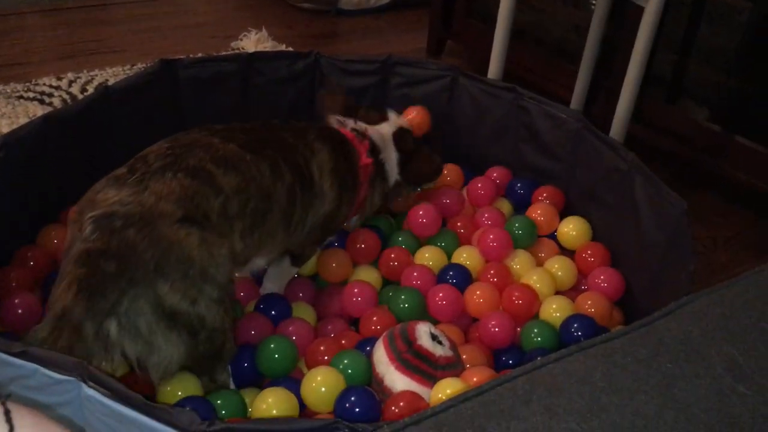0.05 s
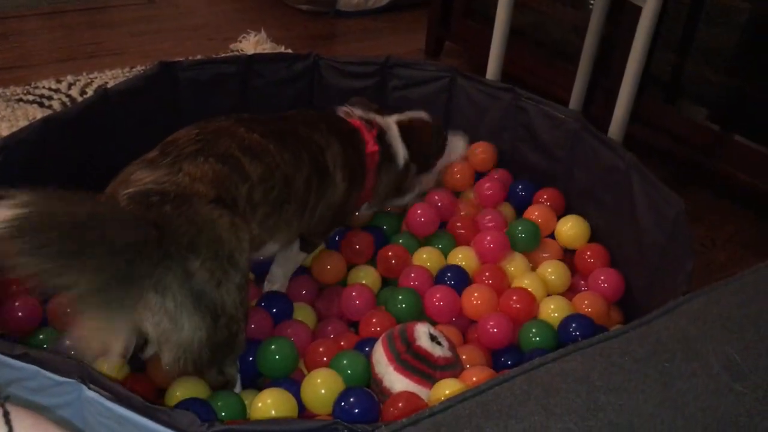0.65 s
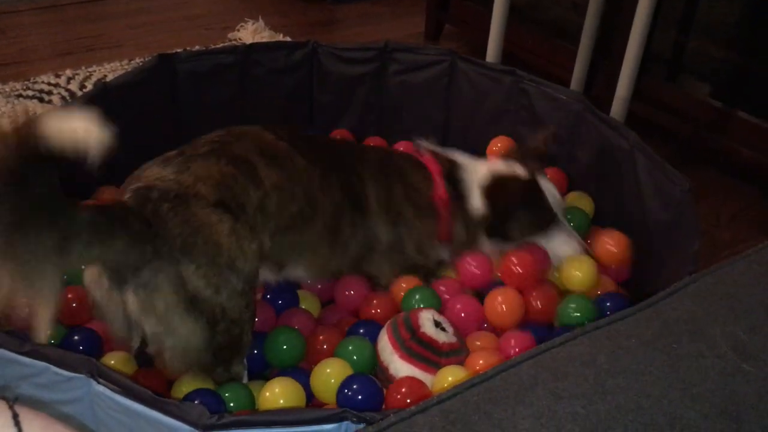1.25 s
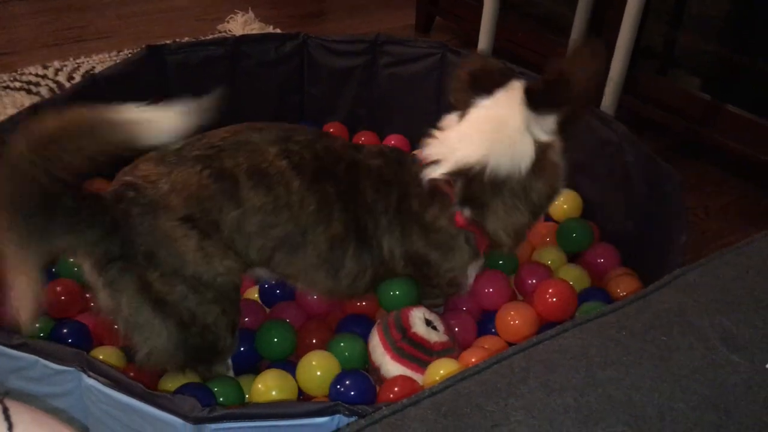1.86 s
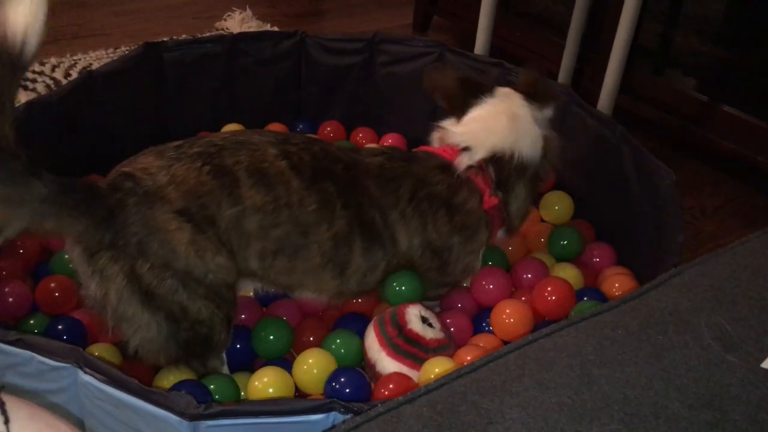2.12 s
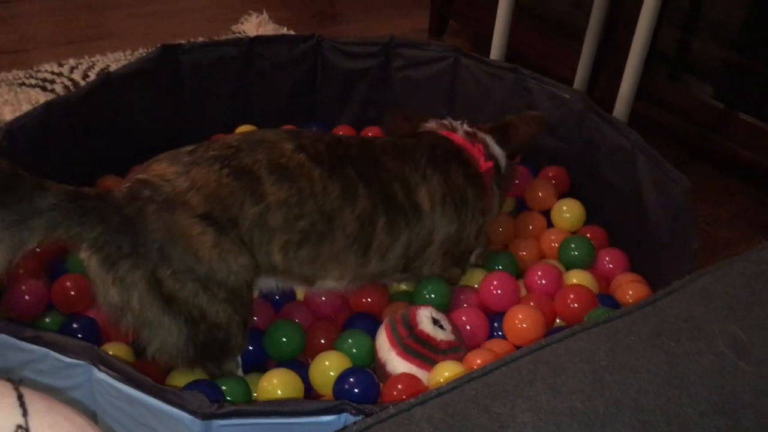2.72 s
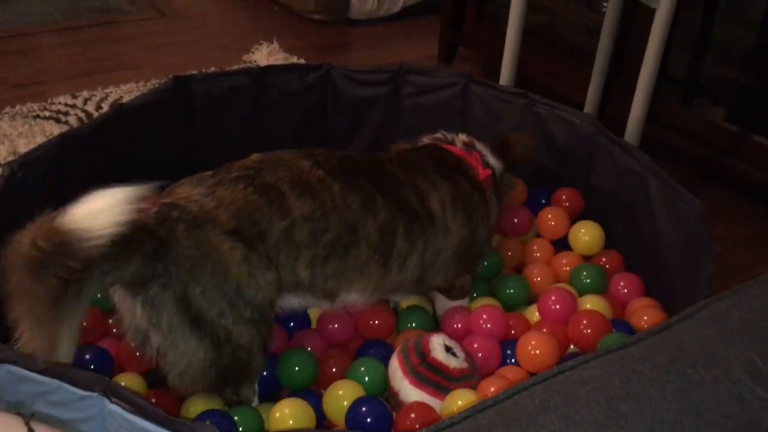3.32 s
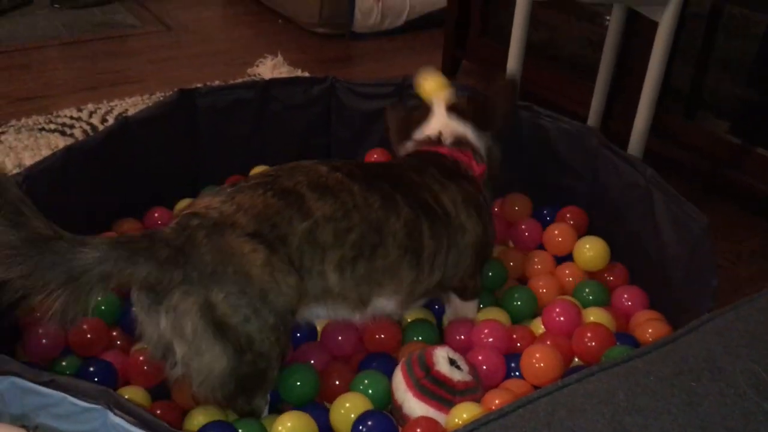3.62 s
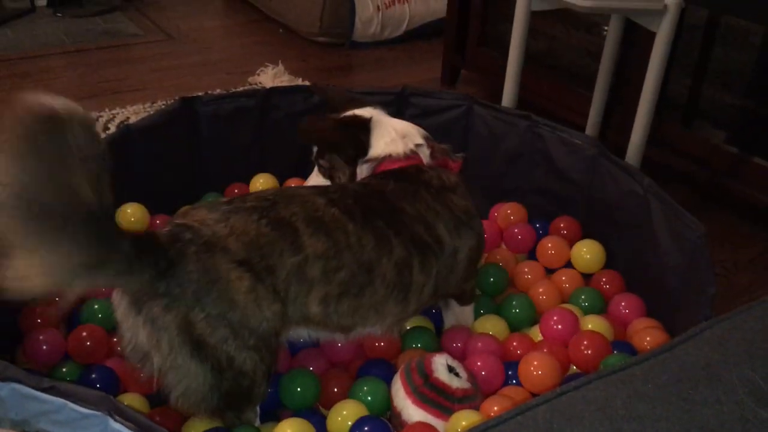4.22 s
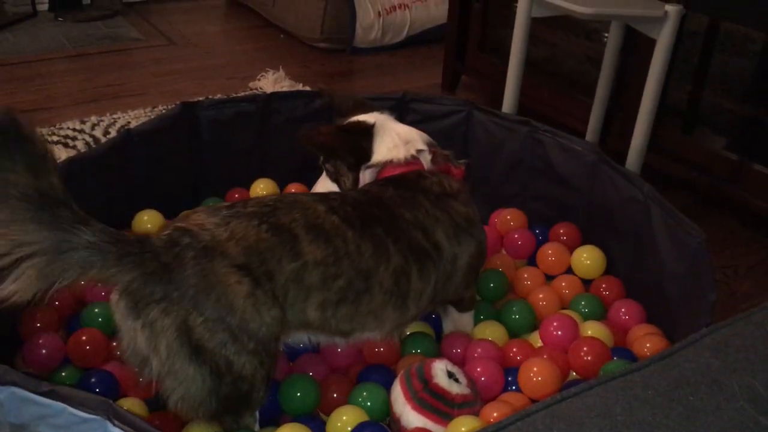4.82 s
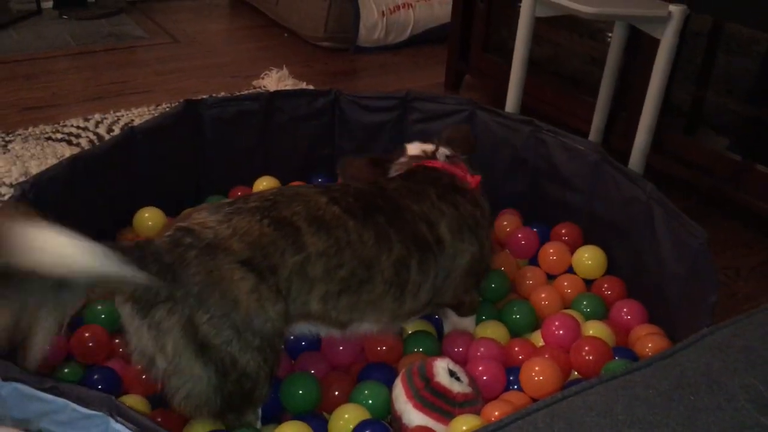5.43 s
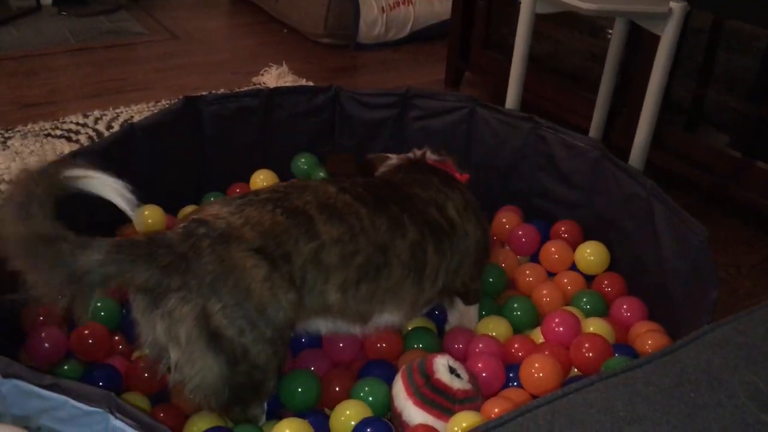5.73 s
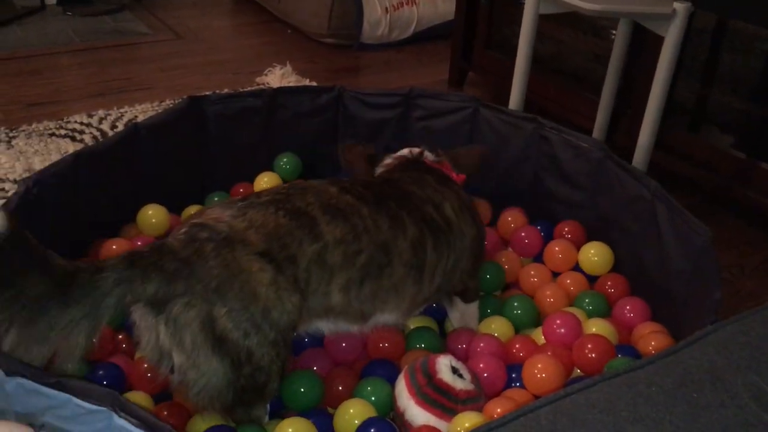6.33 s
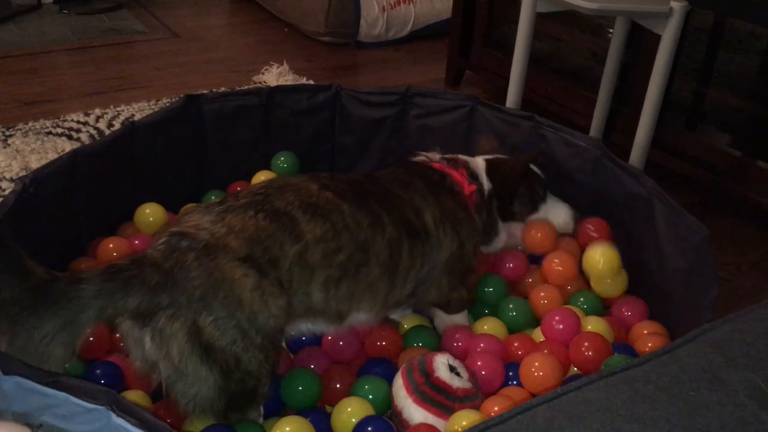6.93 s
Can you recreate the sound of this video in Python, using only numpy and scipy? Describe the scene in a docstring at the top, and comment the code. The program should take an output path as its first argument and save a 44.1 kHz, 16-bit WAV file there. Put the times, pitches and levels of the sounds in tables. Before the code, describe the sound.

From the start, hollow plastic balls rustle, click and knock together as a dog wades through a fabric ball pit, its paws making dull thumps on the floor. The clatter grows busier around 1 second. At about 1.3 seconds a ball skids with a short, sharp hiss, and a shove tumbles the whole heap with a low boom. A firm paw thump lands at 2 seconds, followed by gentler digging with scattered knocks, thumps and brief hisses. Now and then a ball rings very briefly. Just after 4 seconds comes one sharp clack, then a lull with only a few small clicks over the soft, low hum of the room. At about 5.4 seconds the rustling resumes, growing stronger with a thump and bright clacks near 6.7 seconds and continuing to the end at about 7 seconds. Everything sounds fairly near, with a slight room echo.

```python
"""A dog wades and noses through a fabric pit of hollow plastic balls in a quiet room.
From the start the balls rustle, click and knock each other on, and paws push them onto the floor
with dull thumps; now and then a ball rings, or skids with a hiss. Just after one second a shove
tumbles the whole heap. At about four seconds the dog stands still for a second: a few last balls
click over the low hum of the room. Then it digs on to the end."""
import sys
import numpy as np
from scipy import signal
from scipy.fft import rfft, irfft, next_fast_len
from scipy.io import wavfile
from scipy.ndimage import map_coordinates

SR = 44100
rng = np.random.default_rng(int(sys.argv[2]) if len(sys.argv) > 2 else 0)


def unload_audio(sound):
    """Save the sound as a 16-bit wav file, at the path given as the first command line argument."""
    columns = np.transpose(np.atleast_2d(sound))
    # keep every value between -1 and 1, then stretch to whole-number steps
    steps = np.round(np.clip(columns, -1, 1) * 32767)
    wavfile.write(sys.argv[1], SR, steps.astype(np.int16))


N = 311346

# Low thumps on the floor, mostly paws pressing balls down; the row at 4.107 s is the low knock of a dropped
# ball. Each row: start in seconds, relative level in dB, pitch in Hz.
THUMP_ROWS = [(0.014, -30.5, 179), (0.048, -28.5, 167), (0.11, -28, 160), (0.236, -29, 298),
              (0.325, -26, 178), (0.441, -27.5, 152), (0.488, -23, 180), (0.554, -27.5, 192),
              (0.615, -30.5, 240), (0.778, -32, 285), (0.969, -34, 172), (1.315, -30, 118), (1.39, -28, 278),
              (1.472, -30, 127), (2.011, -21, 184), (2.163, -35.5, 127), (2.639, -32.5, 174),
              (2.745, -25.5, 205), (2.781, -29, 230), (2.833, -28.5, 167), (2.902, -29.5, 282),
              (2.969, -29, 172), (3.344, -31, 165), (3.435, -27, 309), (3.44, -24, 173), (3.518, -31.5, 203),
              (4.107, -35, 433), (4.114, -30, 140), (4.211, -38, 99.5), (4.398, -38.5, 122),
              (5.478, -36, 252), (5.636, -36.5, 172), (5.719, -32, 208), (5.798, -35.5, 172),
              (5.891, -38, 303), (6.089, -36.5, 165), (6.209, -35.5, 312), (6.356, -33.5, 252),
              (6.416, -33.5, 323), (6.539, -34, 183), (6.715, -21.5, 180), (6.779, -26, 142)]
# The tone of each part of the pit. Each row: frequency in Hz, relative level in dB.
SKIN_TONE = [(3500, -11), (4900, -13), (6200, -9), (8000, -12), (9500, -5), (10300, -6.5), (11000, -2),
             (13000, 1.5), (15800, -1.5)]  # a ball's thin skin
SHELL_TONE = [(700, -18), (1300, -4.5), (2000, -2.5), (2850, 3), (3900, 0), (4900, -14.5), (8000, -67)]  # one hollow ball
PACKED_TONE = [(200, -21.5), (420, 2.5), (650, 3.5), (1200, 4.5), (1800, -0.5), (3200, -34)]  # balls packed together
FLOOR_TONE = [(25, -40), (55, -13.5), (85, -3.5), (110, -9), (170, 2.5), (230, -4), (300, -2), (420, -16),
              (800, -35)]  # the fabric floor


def rustle():
    """Countless light contacts sound in the stirred heap; a shove tumbles it and makes the pit boom."""
    # The heap tumbles. Each row: time in seconds, relative level in dB.
    tumble_levels = [(1.22, -67), (1.32, -53), (1.36, -45.5), (1.395, -41.5), (1.43, -50), (1.52, -63.5),
                     (1.85, -67)]
    ticks = contacts(per_s=5000, spread_db=4, centre_hz=9500, scatter=.6, cycles=1.3, size=100)
    ticks = unit(skin_ring(colour(ticks, SKIN_TONE)))
    shells = contacts(per_s=1500, spread_db=3.5, centre_hz=2547, scatter=.634, cycles=5.8, size=250)
    shells = unit(colour(shells, SHELL_TONE))
    packed = contacts(per_s=700, spread_db=1, centre_hz=804, scatter=.87, cycles=.55, size=300)
    packed = unit(colour(packed, PACKED_TONE))
    floor = contacts(per_s=200, spread_db=5.5, centre_hz=910, scatter=.42, cycles=.38, size=500)
    floor = unit(colour(floor, FLOOR_TONE))
    boom = unit(resonate(floor, hz=86, sharpness=4))
    heap = amp(-4) * ticks + amp(-4) * shells + amp(-6.5) * packed + amp(2.5) * floor
    shove = packed + amp(-6) * shells + amp(-2.5) * floor + amp(2) * boom
    return stirring() * surges() * heap + settling() * floor + gain_curve(tumble_levels) * shove


def contacts(per_s, spread_db, centre_hz, scatter, cycles, size):
    """Balls touch at random: each touch is a ring, size samples long, with its own pitch and strength."""
    count = int(per_s * N / SR)
    when, strength, pitch = rng.random((count, 3)).T
    hz = centre_hz * np.exp(scatter * (2 * pitch - 1))
    turns = hz[:, None] * np.arange(size) / SR
    gain = amp(-spread_db * np.log(strength + .02))  # many weak touches, a few strong ones
    gain *= rng.choice([-1, 1], count)
    rings = gain[:, None] * np.sin(2 * np.pi * turns) * np.exp(-turns / cycles)
    where = (when * N).astype(int)[:, None] + np.arange(size)
    return unit(np.bincount(where.ravel(), rings.ravel(), N)[:N])


def stirring():
    """How hard the dog stirs the heap, as a gain over time."""
    # Three spells of digging, one list each. Each row: time in seconds, relative level in dB.
    spells = [
        [(0, -49.5), (.2, -55), (.44, -55.5), (.62, -54.5), (.71, -61.5), (.82, -53), (.97, -48.5), (1.29, -45),
         (1.5, -50), (1.85, -52.5), (2.0, -63)],
        [(2.1, -59), (2.5, -57.5), (2.8, -58.5), (3.1, -57.5), (3.19, -64), (3.32, -55), (3.47, -67),
         (3.56, -54), (3.8, -61.5), (4.05, -66)],
        [(5.25, -69.5), (5.41, -64), (5.53, -55), (5.69, -54.5), (5.88, -63), (6.1, -62), (6.4, -56.5),
         (6.53, -58.5), (6.74, -51.5), (6.92, -53.5), (7.06, -46)],
    ]
    return sum(gain_curve(spell) for spell in spells)


def surges(spread_db=2, per_s=45):
    """Balls jam and give way in small clumps, so the rustle swells quickly and at random."""
    points = rng.standard_normal(2000)
    wobble = map_coordinates(points, [np.arange(N) * per_s / SR], mode="mirror")
    return unit(amp(spread_db * wobble))


def clacks(usual_db=-30.5, shell_growth=.77):
    """Each knock sounds a bright tick, a hollow shell and the packed balls together."""
    # The clearest knocks. Each row: start in seconds, strength in dB, packed balls' strength in dB.
    clear_clacks = [(0.0102, -44, -41), (0.1087, -31, -44), (0.2335, -31.5, -42.5), (0.298, -31.5, -42.5),
                    (0.3817, -31.5, -47.5), (0.4419, -35, -44.5), (0.4884, -29, -35.5), (0.5536, -35, -50),
                    (0.615, -31.5, -40), (0.7498, -31.5, -53), (0.7805, -26, -43.5), (0.817, -34, -41),
                    (0.882, -25.5, -51), (0.916, -29.5, -57), (0.9544, -21.5, -45), (0.982, -26.5, -62),
                    (1.0551, -25.5, -40), (1.1635, -28, -60), (1.3871, -23, -38), (1.5968, -38, -36.5),
                    (1.809, -31.5, -50), (2.0108, -30, -42), (2.147, -31, -55), (2.394, -44, -47),
                    (2.4868, -36, -60), (2.7432, -42, -44), (2.775, -35, -53), (2.826, -33, -51),
                    (2.8988, -40, -48), (2.9692, -37, -50), (3.07, -36, -50), (3.2713, -40, -60),
                    (3.3021, -33, -67), (3.3882, -37.5, -57), (3.4356, -32.5, -47), (3.681, -42, -61),
                    (3.7035, -41, -46.5), (3.9305, -46, -48.5), (4.1101, -20, -38.5), (4.2081, -43, -51.5),
                    (4.3984, -42, -54.5), (4.4613, -48.5, -59), (4.6528, -42, -53.5), (4.7468, -43.5, -67),
                    (5.6316, -42, -49), (5.7955, -37, -51), (6.095, -41, -46), (6.2357, -39, -49.5),
                    (6.3592, -38, -44), (6.4862, -36, -67), (6.6636, -30, -46), (6.7166, -26.5, -51),
                    (6.859, -30, -51), (6.9822, -26.5, -59)]
    ticks, shells, packed = np.zeros((3, N))
    for s, db, packed_db in list(clear_clacks) + light_clacks():
        jostle_db = rng.normal(-10, 3.5)  # how much is passed on to the neighbours
        tick = knock(ring_s=.011, jostle_db=jostle_db - 2, jostle_s=.004, snap=.6)
        shell = knock(ring_s=.03, jostle_db=jostle_db, jostle_s=.0028, snap=.28)
        tick = own_voice(tick, centre_hz=9800, scatter=.54, sharpness=6.3, lift_db=-10.5)
        shell = own_voice(shell, centre_hz=2660, scatter=.51, sharpness=1.8, lift_db=6)
        hollow = knock(ring_s=.042, jostle_db=jostle_db, jostle_s=.003, snap=.7)
        shell_db = usual_db + shell_growth * (db - usual_db)  # grows less with force than the tick
        add(ticks, s, amp(db - 10.5) * tick)
        add(shells, s, amp(shell_db - 21.5) * shell)
        add(packed, s, amp(packed_db - 3) * hollow)
    return skin_ring(colour(ticks, SKIN_TONE)) + colour(shells, SHELL_TONE) + colour(packed, PACKED_TONE)


def light_clacks(per_s=12, lift_db=17, spread_db=4):
    """More rows for clacks(): small knocks at random moments, stronger when the dog stirs harder."""
    count = int(per_s * N / SR)
    place, luck = rng.random((count, 2)).T
    when = (np.arange(count) + place) * N / count
    stir_db = 20 * np.log10(stirring()[when.astype(int)])
    db = stir_db + lift_db + spread_db * (2 * luck - 1)
    return list(zip(when / SR, db, db - 22))


def knock(ring_s, jostle_db, jostle_s, snap, neighbours=5):
    """One ball snaps and rattles briefly, then passes weaker knocks on to its neighbours."""
    t = np.arange(SR // 10) / SR
    rattles = amp(-60 * t / ring_s) * rng.standard_normal((neighbours + 1, len(t)))
    rattles /= np.linalg.norm(rattles, axis=1, keepdims=True)
    out = rattles[0].copy()
    out[0] = snap * amp(-(jostle_db + 24) / 2)  # a ball that passes less on snaps more cleanly
    out /= np.linalg.norm(out)
    for turn, rattle in enumerate(rattles[1:]):
        add(out, jostle_s * (turn + rng.random()), amp(jostle_db + rng.normal(0, 1.2)) * rattle)
    return out / out[:SR // 200].std()  # the first 5 ms set the level


def own_voice(x, centre_hz, scatter, sharpness, lift_db):
    """Every ball is squeezed differently and favours its own pitch; the energy stays the same."""
    hz = min(centre_hz * np.exp(scatter * rng.uniform(-1, 1)), SR / 3)
    voiced = x + amp(lift_db) * resonate(x, hz, sharpness)
    return voiced * np.linalg.norm(x) / np.linalg.norm(voiced)


def skin_ring(x):
    """The thin skin, alike on all balls, rings at a few high pitches."""
    # The skin's rings. Each row: pitch in Hz, width in Hz, gain in dB.
    rings = [(6430, 130, -5), (6900, 100, -6), (8580, 104, 0.5), (9570, 77, -2)]
    return x + sum(amp(db) * resonate(x, hz, hz / width) for hz, width, db in rings)


def thumps(swell_s=.00676, shudder_db=-12, shudder_s=.13):
    """A padded blow, mostly from a paw and once from a dropped ball, swells for about one cycle and dies; the
    pit floor shudders after it."""
    blows, shudder = np.zeros((2, N))
    t = np.arange(SR // 4) / SR
    swell = (t / swell_s * np.exp(1 - t / swell_s)) ** 3
    for s, db, hz in THUMP_ROWS:
        phase = 2 * np.pi * hz * (t - swell_s)
        push = np.cos(phase) + amp(-13) * np.cos(1.95 * phase + rng.normal(0, 1))
        add(blows, s, -amp(db - 4.5) * swell * push)
        add(shudder, s, amp(db + shudder_db - 60 * t / shudder_s) * rng.standard_normal(len(t)))
    return blows + colour(shudder, FLOOR_TONE)


def settling(level_db=-23.5, rise_s=.026, fall_s=.072):
    """The floor rustles as a paw settles: this gain rises just before each thump and fades after it."""
    power = np.zeros(N)
    t = np.arange(SR) / SR - .25
    shape = np.exp(-2 * np.maximum(-t / rise_s, t / fall_s))
    for s, db, _ in THUMP_ROWS:
        add(power, s + t[0], amp(db + level_db) ** 2 * shape[s + t >= 0])
    return np.sqrt(power)


def skids(focus=1.3):
    """Balls slip with a hiss that swells and breaks off, each at its own pitch."""
    # Skids. Each row: peak time in seconds, relative level in dB, rise and fall in seconds, pitch in Hz.
    skid_events = [(0.204, -39.5, 0.0047, 0.0035, 10400), (1.31, -19, 0.0031, 0.0044, 8850),
                   (1.318, -32.5, 0.047, 0.021, 9000), (3.338, -44, 0.011, .008, 13000),
                   (3.589, -32.5, 0.052, 0.011, 15100), (3.922, -41, 0.0071, 0.0041, 7000),
                   (6.733, -35.5, 0.011, 0.0081, 14100), (6.759, -31.5, 0.0033, 0.012, 11900),
                   (6.988, -34, 0.0036, 0.0071, 12000)]
    # The tone of slipping skin. Each row: frequency in Hz, relative level in dB.
    slip_tone = [(300, -32), (1000, -2.5), (1500, -9), (3000, -6.5), (4900, -15), (6300, -8.5),
                 (7800, -12.5), (10500, -10), (13000, -4.5), (15800, -5.5)]
    out, t = np.zeros(N), np.arange(N) / SR
    hiss = skin_ring(colour(rng.standard_normal(N), slip_tone))
    for s, db, rise, fall, hz in skid_events:
        slips = unit(hiss + focus * resonate(hiss, hz, sharpness=2))
        swell = np.exp(-np.maximum((s - t) / rise, (t - s) / fall))
        out += amp(db - 3.5) * swell * slips
    return out


def pings(ring_s=.017):
    """A ball that its neighbours do not damp rings briefly at one pitch."""
    # Free balls. Each row: start in seconds, level in dB, pitch in Hz.
    free_balls = [(0.4903, -32, 2120), (0.817, -37, 1630), (1.054, -24, 2840), (1.9073, -36.5, 2780),
                  (3.3063, -39, 2640), (3.681, -38.5, 2550), (4.1093, -41, 3300), (6.2396, -40.5, 2840),
                  (6.986, -35.5, 3040)]
    out, t = np.zeros(N), np.arange(SR // 10) / SR
    for s, db, hz in free_balls:
        add(out, s, amp(db - 60 * t / ring_s) * np.sin(2 * np.pi * hz * t))
    return out


def room(x, pieces=56, delay_s=.004):
    """A furnished room echoes; the dog moves about, so each short piece gets its own random echo."""
    # How long the echo lasts. Each row: frequency in Hz, seconds to fade by 60 dB.
    fade_times = [(100, 0.57), (500, 0.33), (3000, 0.66), (14000, 0.22)]
    echo = np.zeros(N)
    edges = np.linspace(0, N, pieces + 1).astype(int)
    hz, t, noise = signal.stft(rng.standard_normal((pieces, SR // 3)), SR, nperseg=256)
    fade = amp(-60 * t / along(fade_times, hz)[:, None])
    tails = signal.istft(noise * fade, SR, nperseg=256)[1]
    for start, end, tail in zip(edges, edges[1:], tails):
        add(echo, start / SR + delay_s, signal.fftconvolve(x[start:end], tail / np.linalg.norm(tail)))
    return echo


def house_hum(level_db=-52.5):
    """The house gives a steady low rumble and a soft airy hum."""
    # The tone of the background. Each row: frequency in Hz, relative level in dB.
    hum_tone = [(20, -31), (30, -26), (43, 0), (110, -1.5), (155, -12), (220, -13), (470, -25),
                (750, -22.5), (1020, -16), (1500, -27), (2200, -34.5), (3200, -31.5), (4700, -42),
                (15500, -43)]
    return amp(level_db) * unit(colour(rng.standard_normal(N), hum_tone))


def amp(db):
    """Turn decibels into a gain."""
    return 10 ** (np.asarray(db) / 20)


def unit(x):
    """Scale a sound to an average (rms) level of 1."""
    return x / np.sqrt(np.mean(x ** 2) + 1e-20)


def along(points, hz):
    """Read between rows of frequency and value, giving each octave equal room."""
    freqs, values = np.transpose(points)
    return np.interp(np.log(hz + 1), np.log(freqs + 1), values)


def gain_curve(rows):
    """Join rows of seconds and dB into one gain per sample, silent outside the rows."""
    s, db = np.transpose(rows)
    return amp(np.interp(np.arange(N) / SR, s, db, left=-120, right=-120))


def add(track, s, sound):
    """Mix a sound into the track at s seconds."""
    start = max(round(s * SR), 0)
    part = track[start:start + len(sound)]
    part += sound[:len(part)]


def resonate(x, hz, sharpness):
    """Keep the band around one pitch; a sharper band rings longer."""
    return signal.lfilter(*signal.iirpeak(hz, sharpness, SR), x)


def colour(x, tone, size=8192):
    """Give a sound the tone in a table, using a filter with an energy of 1."""
    gains = amp(along(tone, np.fft.rfftfreq(size, 1 / SR)))
    cepstrum = irfft(np.log(gains))
    cepstrum[1:size // 2] *= 2  # folded so that the filter rings only after a hit, never before
    cepstrum[size // 2:] = 0
    response = irfft(np.exp(rfft(cepstrum)))
    return signal.fftconvolve(x, response / np.linalg.norm(response))[:N]


def scene():
    """Mix the balls, the paws, their echo and the background into one channel."""
    balls = rustle() + clacks() + pings() + skids()
    paws = thumps()
    echo = room(amp(-9) * balls + amp(-17.5) * paws)
    return (balls + paws + echo + house_hum())[None]


def record(dry):
    """Cut away the very highest treble."""
    top_hz = 15850
    size = next_fast_len(N + SR // 2)
    kept = np.fft.rfftfreq(size, 1 / SR) < top_hz
    return irfft(rfft(dry, size) * kept, size)[..., :N]


dry = scene()
out = record(dry)
unload_audio(out)
```